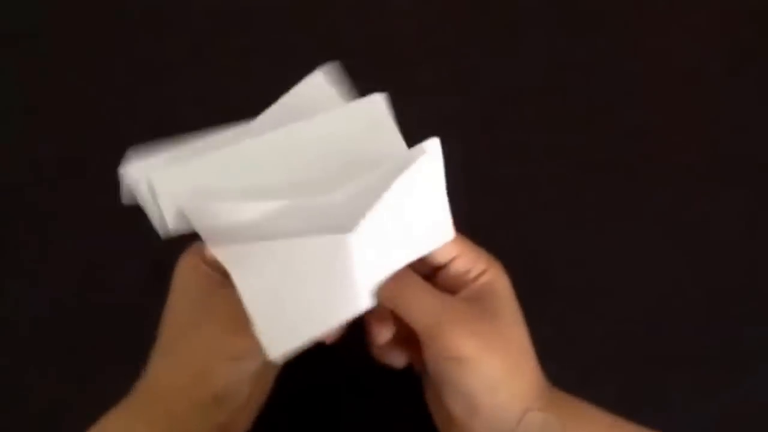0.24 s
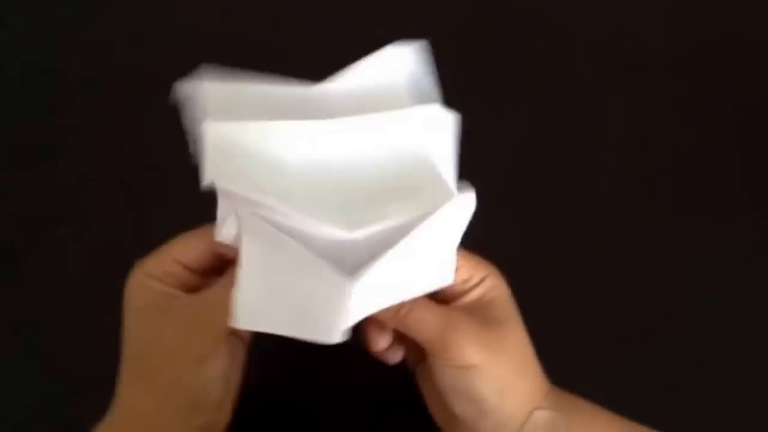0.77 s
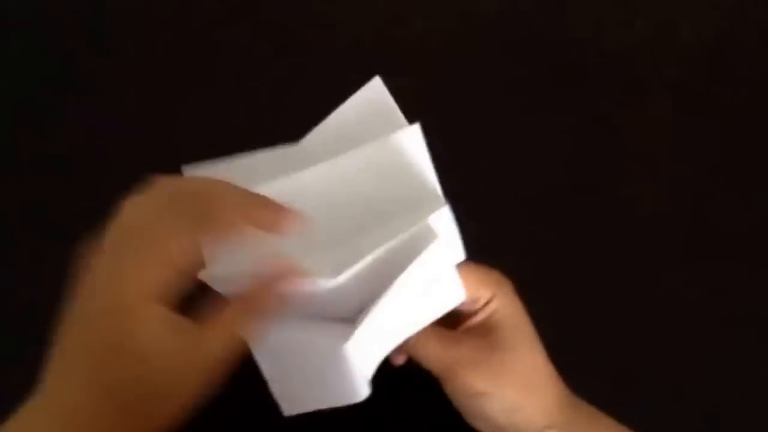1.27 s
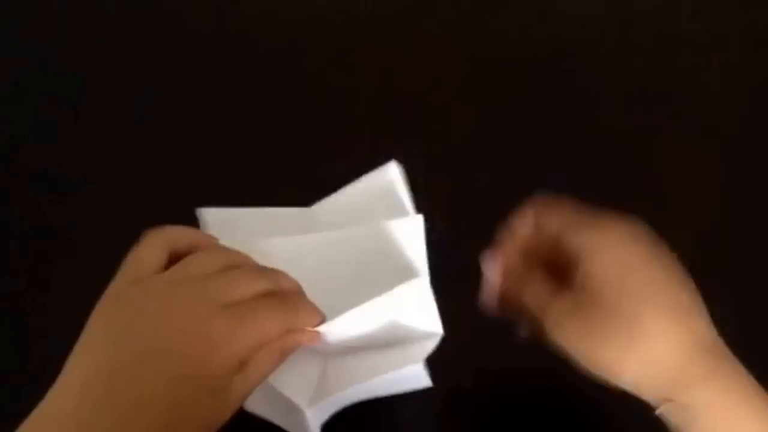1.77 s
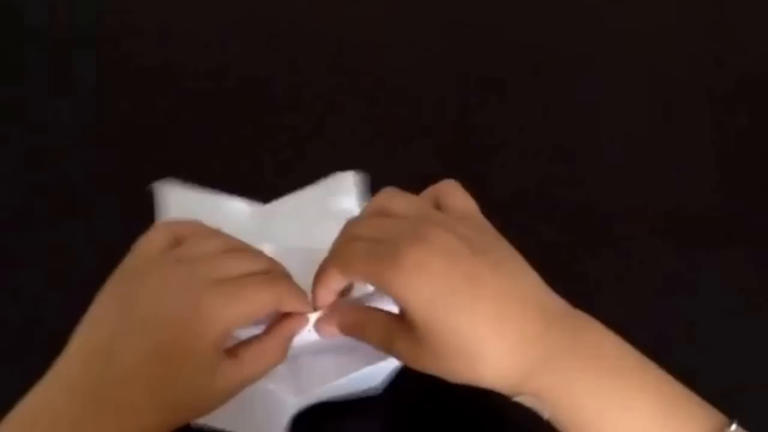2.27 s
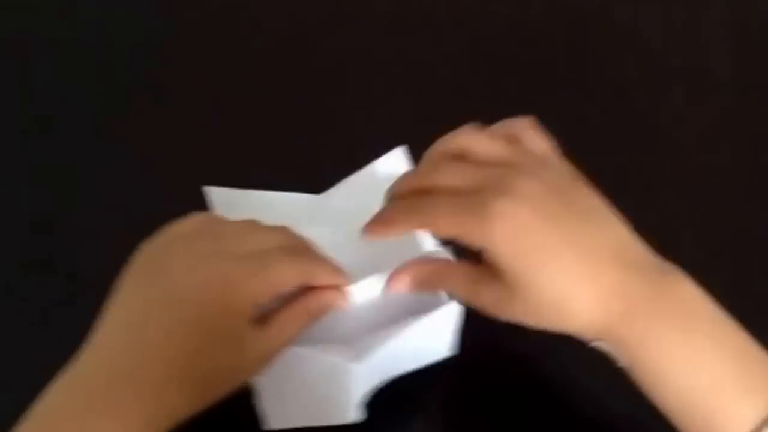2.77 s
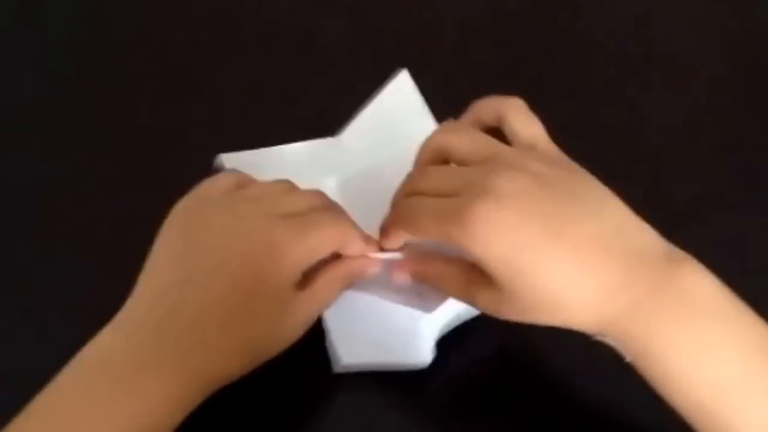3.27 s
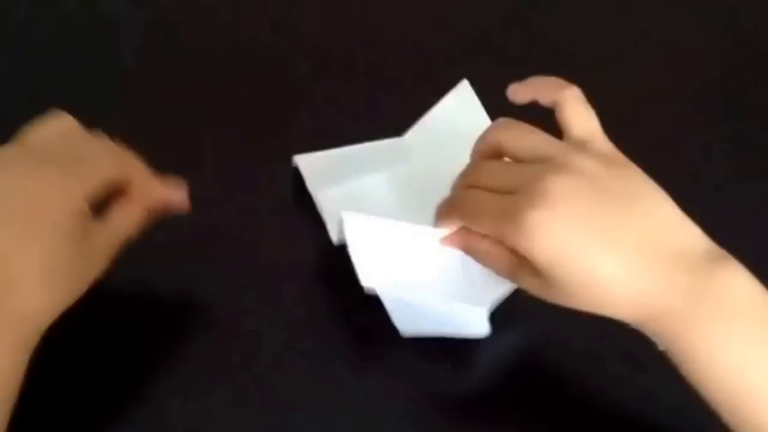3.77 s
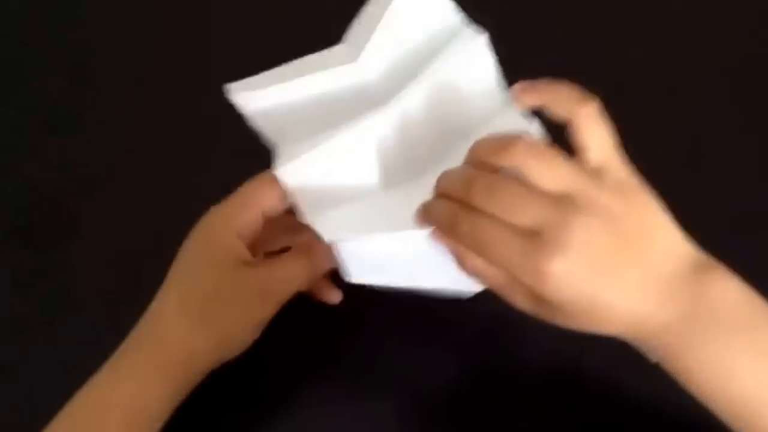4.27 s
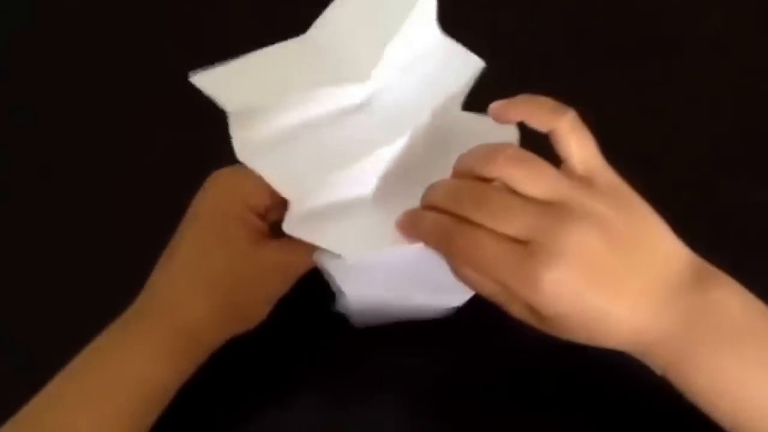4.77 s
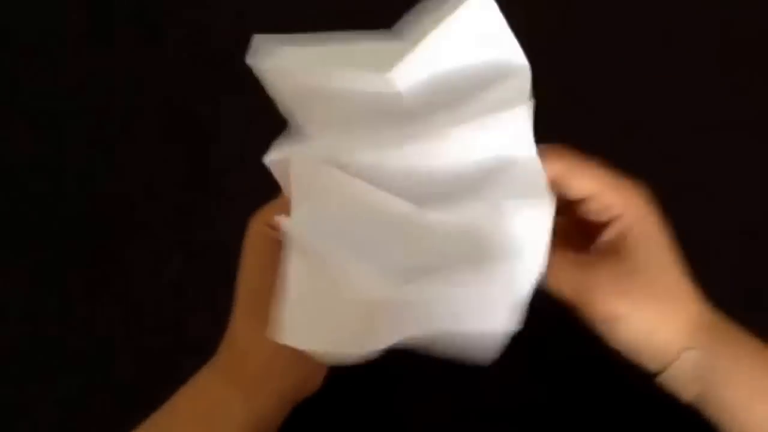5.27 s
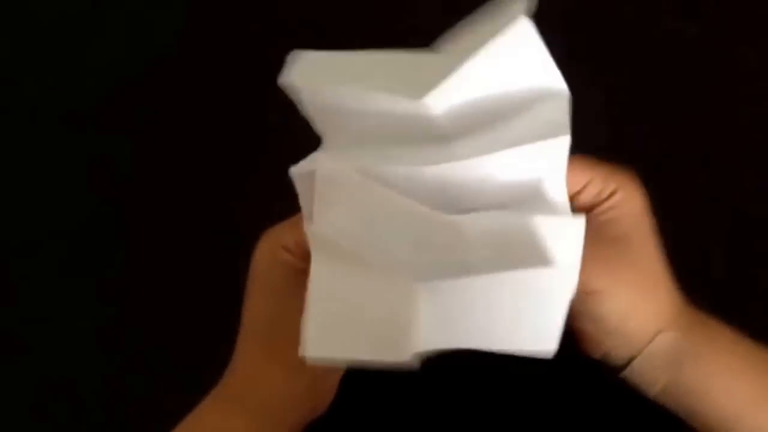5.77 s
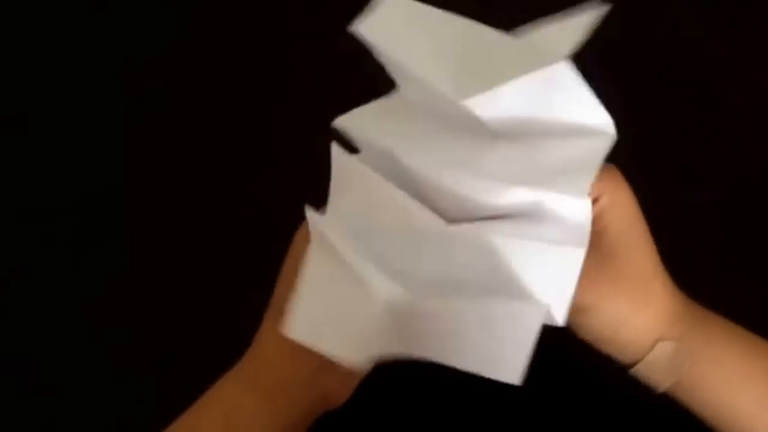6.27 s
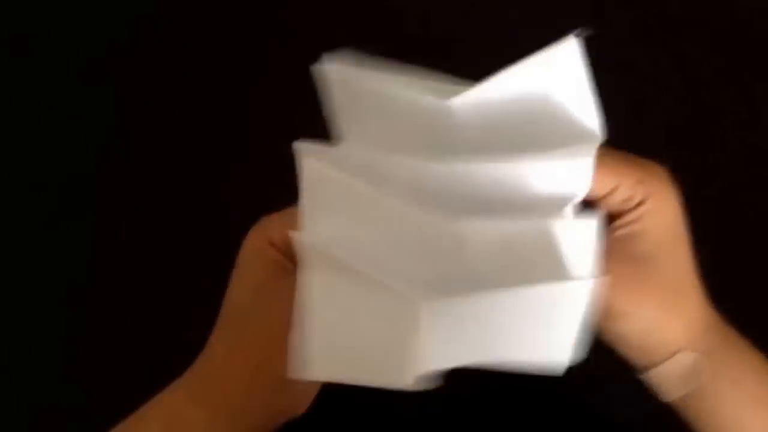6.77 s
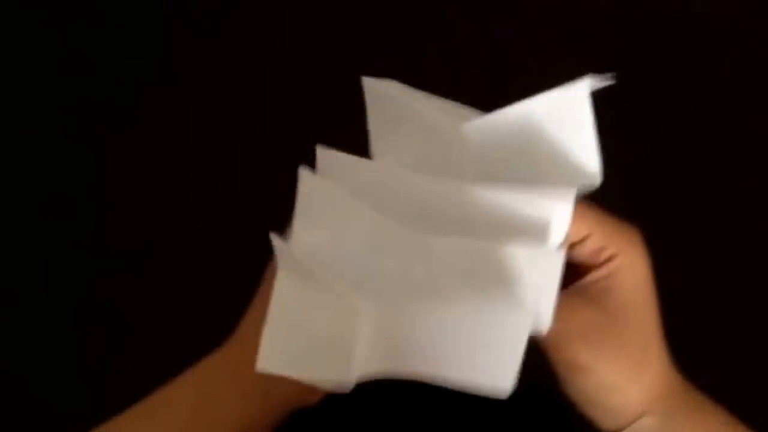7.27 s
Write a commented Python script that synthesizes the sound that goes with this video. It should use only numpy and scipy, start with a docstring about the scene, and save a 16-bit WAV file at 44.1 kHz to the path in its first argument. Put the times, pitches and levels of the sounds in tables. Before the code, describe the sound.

Close, dry paper handling in a quiet room: hissing rubs swell and fade while folds snap, tap, flap and crackle irregularly.

```python
"""A smooth, hissing paper rustle opens over faint room noise: fingers stroke a pleated sheet near a microphone.
Friction noise in three bands swells and fades with each stroke, and small crackles pop inside it.
Sharp snaps, dull flaps and fingertip taps are short noise bursts ringing around a panel resonance.
Narrow noise bands scrape, soft low puffs of air swell, and late on a fold creaks in runs of slips.
A quiet room answers the paper with quick reflections and a faint tail."""
import sys
import numpy as np
from scipy import signal
from scipy.fft import rfft, irfft
from scipy.io import wavfile
from scipy.ndimage import uniform_filter1d

SR = 44100
rng = np.random.default_rng(int(sys.argv[2]) if len(sys.argv) > 2 else 0)


def pcm_store(signal):
    """Save signal as 16-bit PCM."""
    levels = np.round(np.clip(np.atleast_2d(signal), -1, 1) * 32767)
    wavfile.write(sys.argv[1], SR, levels.astype(np.int16).T)


N = 331632  # length in samples


def amp(db):
    """Decibels to gain."""
    return 10 ** (np.asarray(db) / 20)


def unit(x):
    """Scales to rms 1."""
    return x / np.sqrt(np.mean(x ** 2) + 1e-20)


def read(points, hz):
    """Reads (f/Hz, value) points on a log-frequency axis."""
    f, value = np.transpose(points)
    return np.interp(np.log(hz + 1), np.log(f + 1), value)


def shaped(x, spectrum):
    """Gives x an EQ curve of (f/Hz, level/dB) points, then scales it to rms 1."""
    gain = amp(read(spectrum, np.fft.rfftfreq(len(x), 1 / SR)))
    return unit(irfft(rfft(x) * gain, len(x)))


def causal(db):
    """Minimum-phase response of a gain curve: nothing sounds before the blow."""
    log_gain = np.log(amp(np.r_[db, db[-2:0:-1]]))
    return np.exp(np.conj(signal.hilbert(log_gain)))[:len(db)]


def add(mix, s, sound):
    """Mixes a sound in at time s."""
    part = mix[max(round(s * SR), 0):][:len(sound)]
    part += sound[:len(part)]


# EQ of the steady room noise and microphone hiss: [f/Hz, relative level/dB]
FLOOR_SPECTRUM = [(20, -33), (45, -6.5), (65, -1.5), (90, -4), (130, -0.5), (260, -1), (500, -11.5),
                  (1200, -15), (4000, -17.5), (9000, -17), (11000, -24)]


def floor():
    """Steady bed of room noise and microphone hiss: shaped noise at a constant rms level."""
    return amp(-65) * shaped(rng.standard_normal(N), FLOOR_SPECTRUM)


STROKE_RANGE_DB = 20  # a stroke climbs this much in its rise time and drops as much in its fall time
RISE_POWER, FALL_POWER = 1.16, 1.07  # above 1 the top of a stroke is rounded and its ends are steep
HOLD_DB = (-71.5, -76, -76)  # faint rub of the sheet merely being held: flexing, rasp, hiss
# after every flip the pleats rub as they settle; the lag is also the rise time
SETTLE_LAG_S, SETTLE_FALL_S = 0.008, 0.0131
SETTLE_DB = -50.5  # rasp relative to the flip
SETTLE_FLEX_DB, SETTLE_HISS_DB = -7, -5  # relative to the rasp
# strokes of fingers or pleats:
# [t/s at the peak, rasp level/dB, rise/s, fall/s, flexing/dB re rasp, hiss/dB re rasp]
STROKE_EVENTS = [(0.0, -50.5, .02, 0.072, -5, -11), (0.301, -52.5, 0.065, 0.064, -4.5, -1.5),
                 (0.56, -60.5, 0.22, 0.052, -6, 3), (0.605, -67, 0.013, 0.064, 13.5, 0),
                 (0.69, -59, 0.048, 0.1, 9, 10.5), (0.954, -47, 0.052, 0.031, -2, 8),
                 (1.25, -61, 0.099, 0.094, 12.5, -22), (1.407, -64, 0.042, 0.11, 9.5, 2.5),
                 (1.53, -53.5, 0.081, 0.22, -2, -10), (1.67, -56, 0.1, 0.15, -17, 1),
                 (1.754, -53.5, 0.16, 0.045, -6, -11), (1.89, -57.5, 0.083, 0.18, -11, -9),
                 (2, -51, 0.084, 0.08, -8, -5), (2.133, -57.5, .04, 0.4, -5, -3.5),
                 (2.435, -46.5, 0.045, 0.093, -7, 0.5), (2.5, -54.5, 0.055, 0.16, -2.5, -26),
                 (2.865, -63, 0.077, 0.15, -1, -18), (3.016, -64.5, 0.22, 0.29, 1, 3),
                 (3.233, -51.5, .036, 0.03, -6, -4), (3.534, -52, 0.33, 0.071, -8, -2.5),
                 (3.688, -54, 0.21, 0.23, -10, 1), (4.085, -57, 0.13, 0.046, 3, 2),
                 (4.318, -75, 0.021, 0.43, 15, 10.5), (4.49, -62, 0.045, 0.045, -7, 7),
                 (4.601, -57.5, 0.026, 0.017, 2, -3), (4.735, -66, 0.058, 0.093, 8.5, 8),
                 (4.84, -61.5, 0.21, 0.33, -21, 4), (5.029, -49.5, 0.13, 0.065, -0.5, -7),
                 (5.328, -50, 0.027, 0.083, -2, 3.5), (5.42, -65.5, 0.048, .1, 11.5, 4),
                 (5.551, -57.5, 0.042, 0.11, -8, 2), (5.811, -49, 0.1, 0.062, 4, 2),
                 (6.024, -65.5, 0.023, 0.22, 5, 11), (6.18, -65, 0.63, 0.12, 4, 1.5),
                 (6.48, -56, 0.044, 0.033, -1, 7), (6.655, -41.5, 0.034, 0.043, 3.5, -1),
                 (6.801, -48.5, 0.03, 0.023, 11.5, 5), (7.365, -61.5, 0.14, 0.062, 4, 2.5),
                 (7.453, -47.5, 0.055, 0.054, 0, 3)]


def friction_levels(size=64):
    """Flexing, rasp and hiss in dB over time: strokes and settling pleats swell, fade and add in power."""
    t = np.arange(0, N, size) / SR
    settling = [(s + SETTLE_LAG_S, level_db + SETTLE_DB, SETTLE_LAG_S, SETTLE_FALL_S,
                 SETTLE_FLEX_DB, SETTLE_HISS_DB) for s, level_db, *_ in FLIP_EVENTS]
    power = amp(HOLD_DB)[:, None] ** 2 * np.ones(len(t))
    for s, level_db, rise, fall, flex_db, hiss_db in STROKE_EVENTS + settling:
        rising = abs((t - s) / rise) ** RISE_POWER
        falling = abs((t - s) / fall) ** FALL_POWER
        away = np.where(t < s, rising, falling)
        swell = amp(level_db - STROKE_RANGE_DB * away)
        power = power + (amp([[flex_db], [0], [hiss_db]]) * swell) ** 2
    return [np.interp(np.arange(N) / SR, t, 10 * np.log10(part)) for part in power]


def bending(x, patchy_db=4.0, size=256):
    """The sheet's resonances shift as it bends: peaks a few hundred Hz wide that last tens of milliseconds."""
    z = signal.stft(x, nperseg=size)[2]
    patches = uniform_filter1d(rng.standard_normal(z.shape), size=3, axis=0)  # across frequency
    patches = unit(uniform_filter1d(patches, size=14, axis=1))  # across time
    return signal.istft(z * amp(patchy_db * patches), nperseg=size)[1][:N]


# EQ of the low, flexing part of the rubbing: [f/Hz, relative level/dB]
FLEX_SPECTRUM = [(40, -49), (150, -6.5), (350, 7.5), (700, 5.5), (1100, -6.5), (1700, -20), (4000, -34)]
# EQ of its middle, rasping part: [f/Hz, relative level/dB]
RASP_SPECTRUM = [(300, -100), (800, 6.5), (1300, -0.5), (2500, 7.5), (4200, -3), (5500, -61), (10000, -28)]
# EQ of its high, hissing part: [f/Hz, relative level/dB]
HISS_SPECTRUM = [(1000, -78), (3300, -3), (4700, -0.5), (6500, 0), (9000, -3), (11000, -11.5)]


def rubbing(flex, rasp, hiss):
    """Fibres catch and slip: fine friction noise with a few larger slips in it drives the sheet."""
    slips_per_s, spread_db, slip_share, stutter_db = 160, 3.5, 0.42, 2.2
    sizes = amp(spread_db * np.minimum(rng.exponential(1, N), 3))
    sizes = sizes * rng.choice([-1, 1], N)
    slips = unit(sizes * (rng.random(N) < slips_per_s / SR))
    # the grip stutters every few milliseconds, in all bands at once
    stutter = amp(stutter_db * unit(uniform_filter1d(rng.standard_normal(N), size=160)))
    drive = bending(slip_share * slips + stutter * rng.standard_normal(N))
    # the offsets trim the mix of the three bands
    parts = ((flex - 3.0, FLEX_SPECTRUM), (rasp - 0.5, RASP_SPECTRUM), (hiss, HISS_SPECTRUM))
    return sum(amp(part_db) * shaped(drive, spectrum) for part_db, spectrum in parts)


# centres of the thud, body, crack and edge bands of a snap: [f/Hz]
BAND_HZ = [350, 900, 2800, 8500]
# EQ common to all snapping sounds: [f/Hz, level/dB]
SNAP_SPECTRUM = [(30, -47), (100, -14.5), (260, -0.5), (480, -0.5), (2800, -2), (4500, 1.5), (8500, -3.5),
                 (11000, -18.5)]


def snap(level_db, thud_db, body_db, edge_db, ring_hz, decay, rise=0.00037, ring_db=17.0,
         ring_octaves=0.095, size=4096):
    """A panel flips: a dense cloud of bending modes dies within milliseconds, one resonance standing out."""
    t, hz = np.arange(size) / SR, np.fft.rfftfreq(size, 1 / SR)
    envelope = (1 - np.exp(-(t / rise) ** 2)) * np.exp(-t / decay)
    burst = rfft(rng.standard_normal(size) * envelope)
    # the bending wave returns from the next crease and combs the sound into bands
    return_s, returned = rng.uniform(0.0006, 0.0013), 0.4
    burst = burst * (1 - returned * np.exp(-2j * np.pi * hz * return_s))
    # the modes keep their peaks and dips, but share the energy evenly
    broad_db = 10 * np.log10(uniform_filter1d(abs(burst) ** 2, size=90) + 1e-9)
    tilt_db = read(list(zip(BAND_HZ, (thud_db, body_db, 0, edge_db))), hz)
    panel_db = ring_db / (1 + (np.log2((hz + 1) / ring_hz) / ring_octaves) ** 2)
    response = causal(read(SNAP_SPECTRUM, hz) + tilt_db + panel_db - broad_db)
    return amp(level_db) * irfft(burst * response)


CRACKLES_PER_S, HARD_STROKE_DB = 70, -52  # the highest rate, and the rasp level that reaches it
CRACKLE_OVER_RASP_DB, CRACKLE_SPREAD_DB, CRACKLE_DECAY_S = 32.5, 8.5, 0.0011
CRACKLE_COLOUR_DB = (1, 8, -4.5)  # thud, body, edge
CRACKLE_RING_HZ = (650, 4860)  # lowest and highest


def crackles(rasp, count=24):
    """Small creases give way at random, stronger with harder rubbing and more often up to a top rate."""
    chance, strength = rng.random((2, N))
    rate = CRACKLES_PER_S * np.minimum(amp(rasp - HARD_STROKE_DB), 1)
    blows = (chance < rate / SR) * amp(rasp + CRACKLE_SPREAD_DB * (2 * strength - 2))
    ring_hz = np.geomspace(*CRACKLE_RING_HZ, count)
    creases = [snap(CRACKLE_OVER_RASP_DB, *CRACKLE_COLOUR_DB, hz, CRACKLE_DECAY_S) for hz in ring_hz]
    which, out = rng.integers(0, count, N), np.zeros(N)
    for at in np.flatnonzero(blows):
        add(out, at / SR, blows[at] * creases[which[at]])
    return out


# reverberation of the room: [f/Hz, t60/s]
ROOM_DECAY = [(200, 0.23), (1000, 0.36), (4000, 0.26), (10000, 0.29)]


def room(x, early_db=-12, early_t60=0.044, late_db=-13.0, gap=0.003, size=256):
    """Quick reflections from hands and nearby surfaces, then a faint diffuse tail."""
    t = np.arange(SR // 2) / SR
    echoes = rng.random((2, len(t))) < 3000 / SR  # sparse: 3000 per second
    early, late = rng.standard_normal((2, len(t))) * echoes * (t > gap)
    early = early * amp(-60 * t / early_t60)
    hz, age, z = signal.stft(late, SR, nperseg=size)
    fade = amp(-60 * age / read(ROOM_DECAY, hz)[:, None])
    late = signal.istft(z * fade, SR, nperseg=size)[1][:len(t)]
    response = (amp(early_db) * unit(early) + amp(late_db) * unit(late)) / np.sqrt(len(t))
    return signal.fftconvolve(x, response)[:N]


# paper is heavily damped: the panel resonance in a flip or flap is broad
PANEL_RING_DB, PANEL_RING_OCTAVES = 10.5, 0.2
# creases that flip: [t/s, level/dB at 2.8 kHz before EQ and ring, thud/dB, body/dB, edge/dB
# (these three re level), panel ring f/Hz, noise decay/s]
FLIP_EVENTS = [(0.3432, -26, -4, 4.5, -2, 860, 0.0034), (0.4985, -13.5, -4, 4, -11, 850, 0.0043),
               (0.5803, -13.5, 3.5, 4.5, -9.5, 3600, 0.003), (0.6756, -16, -1, 9.5, -7, 3780, 0.0034),
               (0.9067, -9, -2, -3, 4, 696, .0044), (0.9185, -1.5, 3, 2, 5.5, 750, 0.00085),
               (1.387, -16, 2, 5, -1, 3900, .0008), (2.2998, 9, -22, -1.5, -9.5, 2560, 0.0014),
               (2.4132, -11.5, -8, 1, -12, 3750, 0.0021), (2.419, -4.5, -10, 1.5, -18, 550, 0.0042),
               (2.4843, -3, -7, 6, -3, 3300, 0.0033), (2.4878, -0.5, -18, 12.5, -19, 4400, 0.0036),
               (3.0828, 4.5, -35, -6.5, -2.5, 2080, 0.0011), (3.3314, 8, -21.5, -0.5, -6, 1334, 0.0015),
               (3.4617, -4.5, 1.5, 17.5, -1, 4140, 0.0011), (3.5014, -3.5, -37, -1, -5.5, 1620, 0.00094),
               (3.6204, -9.5, -14, 8.5, -10.5, 2260, 0.004), (3.6778, 7, -6.5, 1, -23.5, 3740, 0.0029),
               (4.086, -16.5, -20, 8.5, 4, 1590, 0.0045), (4.307, -11, -9, -3, -12.5, 950, 0.0028),
               (4.8929, -1, -4, 4, 0, 3450, 0.0009), (4.992, -2.5, 0, 3, -12, 1500, .0022),
               (5.2966, -22, 18, 3, 6, 2600, 0.0096), (5.6082, 2, -13, -12.5, -15, 2490, 0.0012),
               (5.6492, -0.5, -0.5, 9, -8, 3960, 0.0014), (5.719, -23.5, 5, 13, -1, 1920, 0.0096),
               (5.7721, -1.5, -6, -13, -13, 585, 0.0027), (5.7817, -7, 4, 3, -17, 800, 0.0022),
               (6.0257, -21, 12, 6, 2.5, 3600, .004), (6.608, -12.5, 0, 4, -4, 610, 0.00074),
               (6.648, -12, 21.5, 18.5, -14, 2670, 0.0061), (6.6159, -1.5, 2.5, 0, -5, 580, 0.0031),
               (6.7292, -4, -1, 3, -8.5, 2390, 0.0013), (6.735, -3, 2.5, 1.5, -12, 5560, 0.00082),
               (6.78, -12.5, 10.5, 16, 1.5, 4700, 0.0022), (7.3928, -18.5, 4, 0, -8, 700, 0.0029),
               (7.4354, -2.5, -15, -2, -26, 4200, 0.0022)]


def flips():
    """Creases flip over with sharp cracks, each exciting its panel's broad resonance."""
    out = np.zeros(N)
    for s, *blow in FLIP_EVENTS:
        add(out, s, snap(*blow, ring_db=PANEL_RING_DB, ring_octaves=PANEL_RING_OCTAVES))
    return out


SCRAPE_WIDTH_HZ = 620  # between the half-amplitude points
# an edge slides over a panel: [t/s at the peak, level/dB, half length/s, centre f/Hz]
SCRAPE_EVENTS = [(0.473, -60, .07, 4400), (2.348, -48.5, 0.05, 2160)]


def scrapes():
    """A sliding edge chatters at a nearly even rate: a narrow band of noise that swells and fades."""
    t, hz, out = np.arange(N) / SR, np.fft.rfftfreq(N, 1 / SR), np.zeros(N)
    noise = rfft(rng.standard_normal(N))
    for s, level_db, half_length, centre_hz in SCRAPE_EVENTS:
        chatter = irfft(noise / (1 + (2 * (hz - centre_hz) / SCRAPE_WIDTH_HZ) ** 2), N)
        swell = np.exp(-((t - s) / half_length) ** 2)
        out += amp(level_db) * unit(chatter) * swell
    return out


FLAP_BODY_DB, FLAP_BODY_SHARE, FLAP_EDGE_DB = 5, 0.34, -30.5  # the body takes a share of the weight
# panels slap together: [t/s, level/dB at 2.8 kHz before EQ and ring, bass weight/dB re level,
# panel ring f/Hz, noise decay/s]
FLAP_EVENTS = [(0.4075, -9, -8, 920, 0.0048), (0.5568, -19.5, -6, 2130, 0.002),
               (0.968, -1, 4.5, 3770, 0.0093), (1.1962, 1.5, -9, 810, 0.0046),
               (1.2344, -15, 2, 2420, 0.013), (1.5347, -9.5, 6, 3150, 0.0076),
               (1.5644, -11, -8, 940, 0.0097), (1.6926, -18, 9, 1090, 0.0076),
               (1.7018, -7.5, -1, 2860, 0.0098), (1.7091, -15, -1.5, 990, 0.0045),
               (1.7415, -10.5, -2.5, 2130, 0.01), (2.067, -15.5, -6, 2540, 0.011),
               (2.331, -7.5, -2.5, 960, 0.0077), (3.2204, -21, 7.5, 1080, .0076),
               (4.5942, -19, 8, 3280, 0.0081), (4.9844, -3, -9, 1590, 0.0039),
               (4.995, -11.5, 6.5, 1480, 0.0054), (6.06, -19.5, 15, 1770, 0.006),
               (6.666, -4, -11, 736, 0.0017), (6.8289, -12, 7, 705, 0.0071),
               (7.4592, -5.5, 7.5, 3760, 0.011)]


def flaps():
    """Panels meet face to face, slower and without an edge: the larger, the more thud and body."""
    out = np.zeros(N)
    for s, level_db, weight_db, ring_hz, decay in FLAP_EVENTS:
        body_db = FLAP_BODY_DB + FLAP_BODY_SHARE * weight_db
        slap = snap(level_db, weight_db, body_db, FLAP_EDGE_DB, ring_hz, decay, rise=0.00066,
                    ring_db=PANEL_RING_DB, ring_octaves=PANEL_RING_OCTAVES)
        add(out, s, slap)
    return out


# EQ of a puff: [multiple of its centre frequency, relative level/dB]
EDDY_SPECTRUM = [(.15, -36), (.45, -12), (1.1, -4), (1.6, -15.5), (2.5, -26.5), (5, -37), (12, -90)]
# air pushed against the microphone: [t/s at the peak, level/dB, half length/s, centre f/Hz]
PUFF_EVENTS = [(1.083, -50, 0.037, 202), (2.002, -46.5, 0.067, 121), (2.817, -47, 0.085, 120),
               (3.76, -50, 0.051, 137), (3.95, -61, 0.12, 170), (4.7, -70, 0.42, 172),
               (5.345, -56, 0.067, 215), (6.949, -48.5, 0.044, 169)]


def puffs():
    """Sweeps of a hand or the sheet send low, turbulent swells of air over the microphone."""
    out = np.zeros(N)
    t = np.arange(SR // 2) / SR - 1 / 4  # time from the peak
    for s, level_db, half_length, hz in PUFF_EVENTS:
        spectrum = [(hz * ratio, db) for ratio, db in EDDY_SPECTRUM]
        eddies = shaped(rng.standard_normal(len(t)), spectrum)
        swell = np.exp(-(t / half_length) ** 2)
        puff = unit(swell * eddies) * np.sqrt(np.mean(swell ** 2))
        add(out, s + t[0], amp(level_db) * puff)
    return out


# a soft knock falls away on both sides of its pitch
TAP_BELOW_DB_PER_OCT, TAP_ABOVE_DB_PER_OCT = 13.0, 11.0
TAP_RING_DB, TAP_RING_OCTAVES = 12, 0.38
# a fingertip knocks on a panel: [t/s, level/dB at its pitch before EQ and ring, pitch f/Hz, noise decay/s]
TAP_EVENTS = [(1.994, -7, 790, 0.0065), (2.966, -10.5, 557, .0024), (3.0374, -7, 1300, 0.0033),
              (3.4281, -5.5, 1440, 0.0013), (3.983, -8.5, 1030, 0.0023), (3.9945, -6.5, 1250, 0.0082),
              (4.0145, -7, 870, 0.0039), (4.1142, -9, 816, 0.0047), (4.5581, -8.5, 1140, 0.0041),
              (4.8613, -7.5, 1110, 0.00063), (5.2959, -12, 292, 0.0026), (6.4705, -8.5, 696, .0036),
              (6.4908, 0, 560, 0.0061)]


def taps():
    """A soft fingertip stirs mostly the modes near one pitch."""
    out = np.zeros(N)
    for s, level_db, pitch_hz, decay in TAP_EVENTS:
        octaves = np.log2(np.array(BAND_HZ) / pitch_hz)
        bands_db = np.minimum(TAP_BELOW_DB_PER_OCT * octaves, -TAP_ABOVE_DB_PER_OCT * octaves)
        thud, body, crack, edge = bands_db
        # snap counts its bands from the crack band
        knock = snap(level_db + crack, thud - crack, body - crack, edge - crack, pitch_hz, decay,
                     ring_db=TAP_RING_DB, ring_octaves=TAP_RING_OCTAVES)
        add(out, s, knock)
    return out


CREAK_COLOUR_DB = (10, 6.5, 1)  # thud, body, edge
CREAK_RING_HZ, CREAK_DECAY_S, CREAK_JITTER_S = 1980, 0.0026, 0.00034
# a pinched fold sticks and slips: [start t/s, length/s, slip rate f/Hz, level/dB at the start, at the end]
CREAK_EVENTS = [(6.367, .045, 54, -31, -29), (6.426, .036, 131, -28.5, -23)]


def creaks():
    """Nearly even runs of tiny slips that grow as the pinch tightens."""
    out = np.zeros(N)
    for start, length, rate, first_db, last_db in CREAK_EVENTS:
        for age in np.arange(0, length, 1 / rate):
            level_db = first_db + (last_db - first_db) * age / length
            slip = snap(level_db, *CREAK_COLOUR_DB, CREAK_RING_HZ, CREAK_DECAY_S, ring_db=10.5)
            add(out, start + age + CREAK_JITTER_S * rng.standard_normal(), slip)
    return out


def scene():
    """Paper in its room, with the air puffs and the steady floor left dry."""
    flex, rasp, hiss = friction_levels()
    paper = rubbing(flex, rasp, hiss) + crackles(rasp)
    paper = paper + flips() + scrapes() + flaps() + taps() + creaks()
    return (paper + room(paper) + puffs() + floor())[None]


def record(dry):
    """The recorder's steep band limit: a low-pass filter at 10850 Hz."""
    lowpass = signal.firwin(301, 10850, window=("kaiser", 8), fs=SR)
    return signal.oaconvolve(dry, lowpass[None], "same")


dry = scene()
out = record(dry)
pcm_store(out)
```